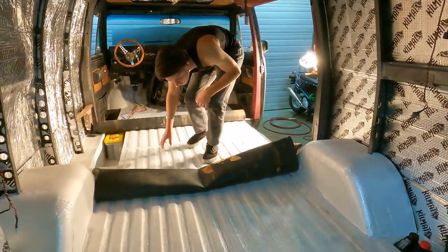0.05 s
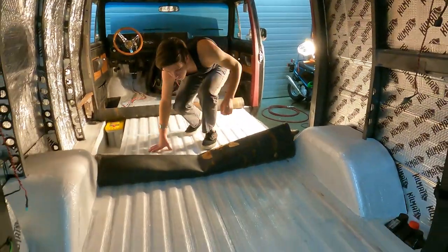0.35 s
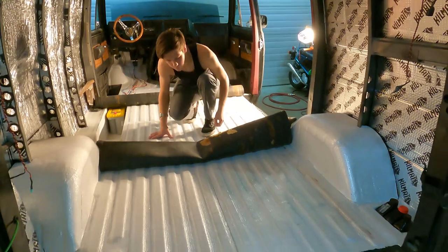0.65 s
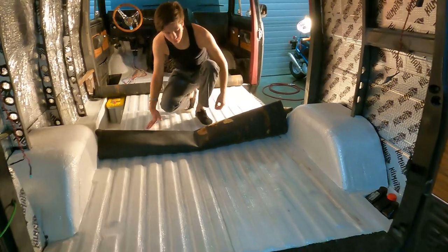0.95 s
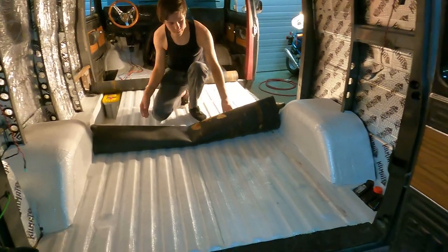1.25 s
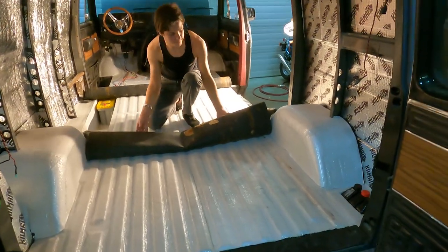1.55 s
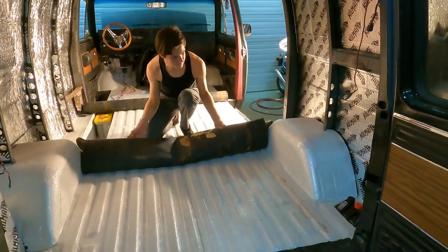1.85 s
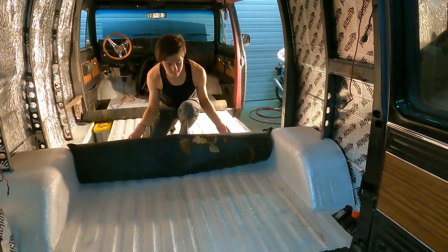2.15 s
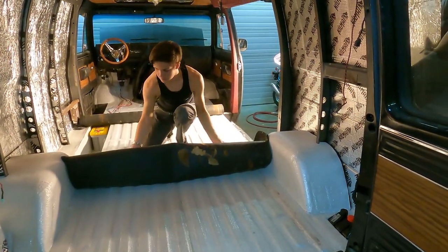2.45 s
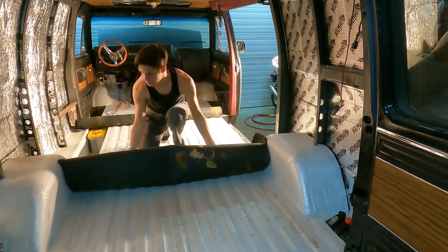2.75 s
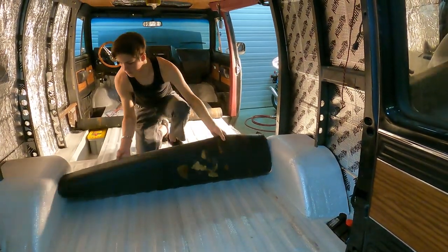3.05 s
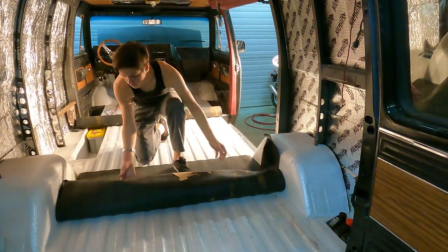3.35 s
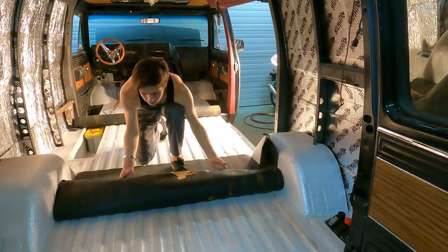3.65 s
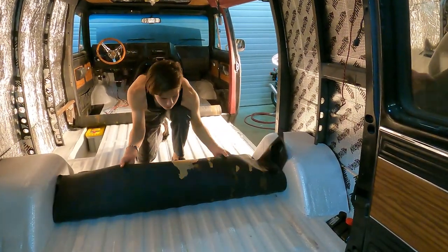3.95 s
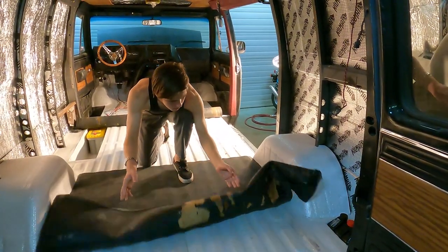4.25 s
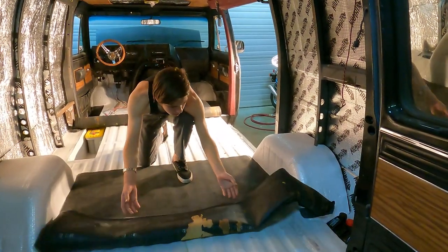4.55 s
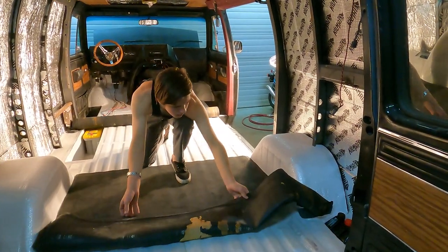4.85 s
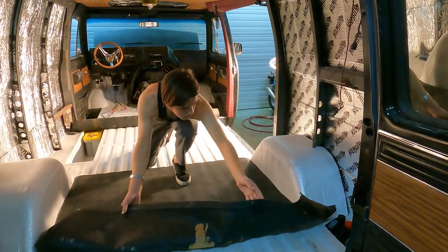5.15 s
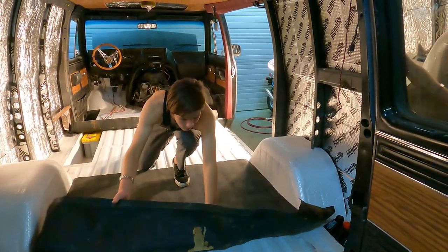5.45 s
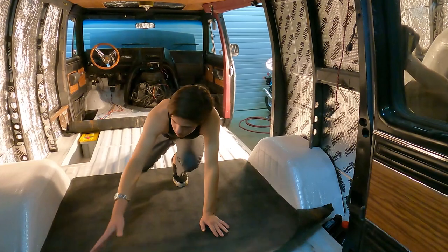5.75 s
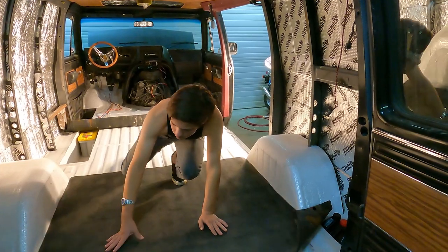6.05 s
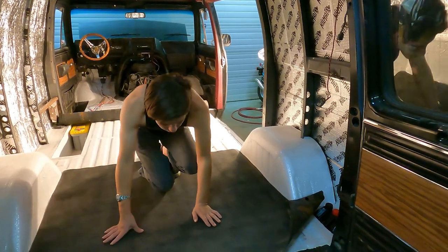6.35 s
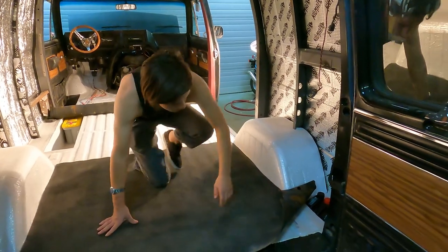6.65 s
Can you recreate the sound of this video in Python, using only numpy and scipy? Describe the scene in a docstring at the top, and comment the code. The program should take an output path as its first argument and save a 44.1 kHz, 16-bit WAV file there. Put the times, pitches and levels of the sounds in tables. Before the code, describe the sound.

Knees and shoes thud and scuff on a ringing van floor as heavy rubber rubs along and lands with two hard slaps.

```python
"""Inside a stripped van, heard from the rear doors, a thick rubber mat is pushed open over the floor.
Rubber drags, cloth swishes, and soles scuff and tick; knees, shoes and the roll thud on the ribbed
steel and rock the van. A loose bit of metal clinks, and twice the mat slaps down hard.
The floor rings, the bare cabin adds a short, boxy echo, and the slaps overload the microphone."""
import sys
import numpy as np
from scipy import signal
from scipy.fft import rfft, irfft, next_fast_len
from scipy.io import wavfile

SR = 44100
rng = np.random.default_rng(int(sys.argv[2]) if len(sys.argv) > 2 else 0)


def log_audio(samples):
    """Write samples as a 16-bit WAV file to the path given in sys.argv[1]."""
    # one column per channel
    frames = np.atleast_2d(samples).T
    # limit to full scale, then quantise
    limited = np.clip(frames, -1, 1)
    pcm = np.round(limited * 32767).astype(np.int16)
    wavfile.write(sys.argv[1], SR, pcm)


N = 295470
TIME = np.arange(N) / SR
SHORT = 2 ** 15  # samples in one event or echo
LEFT_RIGHT = np.array([[1], [-1]])


def undb(db):
    """Turn decibels into a volume factor."""
    return 10 ** (np.asarray(db) / 20)


def unit(x):
    """Scale a sound to an average strength (rms) of one."""
    return x / np.sqrt(np.mean(x ** 2))


def read(points, hz):
    """Look up a value between (frequency, value) points, with octaves evenly spaced."""
    point_hz, value = np.transpose(points)
    return np.interp(np.log(hz), np.log(point_hz), value)


def colour(x, points):
    """Turn each frequency up or down along a tone curve."""
    size = next_fast_len(len(x))
    hz = np.maximum(np.fft.rfftfreq(size, 1 / SR), 1)
    return irfft(rfft(x, size) * undb(read(points, hz)), size)[:len(x)]


def band(x, hz, width_hz):
    """Keep only the frequencies around hz."""
    low = np.hypot(hz, width_hz / 2) - width_hz / 2
    return signal.sosfilt(signal.butter(2, [low, low + width_hz], "band", fs=SR, output="sos"), x)


def swell(rise, fade):
    """Loudness of one event: it rises smoothly, then drops 60 dB every `fade` seconds."""
    t = TIME[:SHORT]
    onset = np.sin(np.pi / 2 * np.minimum(t / rise, 1)) ** 2
    return onset * np.exp(-np.log(1000) * np.maximum(t - rise, 0) / fade)


def add(track, start, sound):
    """Mix a short sound into a track at `start` seconds."""
    i = int(start * SR)
    track[..., i:i + SHORT] += sound[..., :N - i]


def wander(rate):
    """Glide to a new random value `rate` times a second."""
    return np.interp(TIME * rate, np.arange(2000), rng.standard_normal(2000))


def slips(rate, spread_db, size=SHORT):
    """Friction is a stream of tiny slips of uneven size, about `rate` a second."""
    chance, strength = rng.random(size), rng.standard_normal(size)
    at = np.flatnonzero(chance < rate / SR)
    out = np.zeros(size)
    out[at] = (-1.) ** at * undb(spread_db * strength[at])
    return out


# short rubs: (time [s], level [dB], pitch [Hz], rise [s], fade [s], grit compared with the rub [dB])
SCUFFS = [(0, -37.5, 790, 0.0013, 0.34, -6), (.259, -36, 814, 0.0067, 0.3, -3.5),
          (.527, -36, 1290, .03, 0.3, -5.5), (0.913, -33.5, 910, 0.032, 0.28, -3.5),
          (2.536, -26, 520, 0.0018, 0.2, -35), (2.631, -27.5, 600, 0.0011, 0.042, -30),
          (2.654, -28, 594, 0.0061, 0.054, -40), (2.811, -39.5, 610, 0.0018, 0.16, -39),
          (3.155, -29.5, 836, 0.021, 0.092, -9.5), (3.297, -20, 615, 0.028, 0.12, -47),
          (3.828, -41.5, 830, 0.0034, 0.2, -21), (3.931, -34, 715, 0.0025, 0.51, -38),
          (4.304, -31.5, 1400, .004, 0.041, -5), (4.319, -22.5, 350, 0.0031, 0.1, -30),
          (4.415, -18, 1670, .002, 0.049, -42), (4.597, -29, 417, 0.025, 0.32, -44),
          (4.636, -31, 910, 0.017, 0.2, -25), (5.033, -26, 520, 0.062, 0.081, -52),
          (5.577, -40.5, 1810, 0.0021, 0.26, -17), (6.493, -42, 2160, 0.0013, 0.15, -20.5)]

def scuffs():
    """A sole, cloth or rubber slips briefly along the floor, with grit hissing above the rub."""
    out = np.zeros(N)
    for start, db, hz, rise, fade, grit_db in SCUFFS:
        friction = slips(3000, spread_db=4.8)
        rub = unit(band(friction, hz, width_hz=1.09 * hz))
        grit = undb(grit_db) * unit(band(friction, hz=3320, width_hz=2030))
        add(out, start, undb(db) * (rub + grit) * swell(rise, fade))
    return out


# brushes over the mat: (time [s], level [dB], rise [s])
SWISHES = [(0, -50, 0.0024), (2.271, -48, 0.072), (4.202, -45, 0.033), (4.828, -52.5, 0.027),
           (5.101, -44, 0.034), (5.65, -57, 0.021)]

def swishes():
    """Cloth and hands brush the rubber with a bright hiss."""
    out = np.zeros(N)
    for start, db, rise in SWISHES:
        hiss = unit(band(slips(6000, spread_db=4.2), hz=6500, width_hz=5800))
        add(out, start, undb(db) * hiss * swell(rise, fade=0.13))
    return out


# slides of the mat, a shoe or a trouser leg, with the strengths they reach before dragging() mixes them:
# (start [s], end [s], rubbing [dB], flexing [dB], hiss [dB])
PUSHES = [(0.018, 0.245, -73, -58, -63.5), (0.33, 0.612, -73, -61, -55.5), (0.807, 1.008, -64, -39.5, -66),
          (1.083, 1.515, -71, -62, -62), (1.574, 2.144, -45, -44.5, -59.5),
          (2.14, 2.416, -42, -38.5, -54.5), (2.4, 2.613, -51, -37, -66), (2.812, 3.35, -33.5, -30, -47.5),
          (3.73, 3.943, -43, -39.5, -63), (3.882, 4.36, -32, -28.5, -47), (4.567, 4.69, -56, -32.5, -83),
          (4.8, 5.14, -41.5, -38, -59), (5.168, 5.232, -43.5, -41, -61), (5.316, 5.623, -45.5, -40, -57),
          (6.32, 6.7, -49.5, -42.5, -59)]

def pushes(onset_s=0.045, grow_db_per_s=22, stop_db_per_s=190):
    """Strength of rubbing, flexing and hiss: each push gathers speed, then stops."""
    resting = undb([-65, -47, -70])  # what goes on between moves
    power = resting[:, None] ** 2 * np.ones(N)
    for start, end, *levels_db in PUSHES:
        onset = np.clip((TIME - start) / onset_s, 0, 1)
        speed = onset * undb(np.minimum(grow_db_per_s * (TIME - end), stop_db_per_s * (end - TIME)))
        power += np.outer(undb(levels_db), speed) ** 2
    settling = np.outer(undb([-24.5, -19.5, -38]), swell(rise=0.032, fade=0.64))
    for start, db, *_ in SLAPS:  # the mat creeps into place after each slap
        add(power, start, (undb(db) * settling) ** 2)
    return np.sqrt(power)


# tone curves of rubber flexing, rubbing and hissing: (frequency [Hz], level [dB])
FLEX_TONE = [(50, -50), (100, -6.5), (150, -2), (210, -0.5), (290, -11), (400, -12), (600, -50),
             (1500, -88)]
RUB_TONE = [(200, 9), (450, 9), (620, 7), (800, 1), (1100, 4), (1600, -0.5), (2400, -42), (4000, -24),
            (9000, -28)]
HISS_TONE = [(800, 1.5), (2000, 4), (3200, 0.5), (4300, -3.5), (5500, -2.5), (7400, -2.5), (8400, -12.5),
             (12300, -16.5), (14000, -33), (16000, -35)]

def dragging():
    """The roll flops over the ribs, and its rubber rubs and hisses along the paint."""
    rub_strength, flex_strength, hiss_strength = pushes()
    grip = undb(1.5 * wander(rate=28))  # the rubber catches and lets go
    hiss = hiss_strength * unit(colour(slips(14000, spread_db=4, size=N), HISS_TONE))
    flex = flex_strength * unit(colour(slips(300, spread_db=2.9, size=N), FLEX_TONE))
    rub = rub_strength * grip * unit(colour(slips(1200, spread_db=2.3, size=N), RUB_TONE))
    return undb(-4) * flex + undb(-3) * rub + undb(5) * hiss


# soft blows of knees, shoes and the roll: (time [s], level [dB], pitch [Hz], fade [cycles])
THUDS = [(0.075, -29.5, 63, 7.9), (0.215, -15, 181.4, 52), (0.222, -18.5, 69, 8.1), (0.515, -22, 51, 22),
         (0.66, -23, 67, 6.7), (1.013, -24.5, 116, 8.9), (1.051, -26, 50, 10), (1.41, -26, 42.6, 16),
         (2.038, -30.5, 173.5, 90), (2.54, -16, 244, 12), (2.656, -12.5, 320, 4.8), (2.692, -20, 163, 5.5),
         (2.814, -20, 257, 1.6), (2.835, -29.5, 39.8, 23), (3.176, -27, 182, 57), (3.336, 0, 118.5, 12.8),
         (3.345, -5, 385, 18), (3.385, -21, 41.2, 12), (3.39, -9.5, 116, 14), (3.436, -13, 131, 35),
         (3.966, -18.5, 155, 22), (4.346, -12.5, 296, 17), (4.356, -7.5, 186, 14.6),
         (4.361, -21.5, 41.7, 6.3), (4.541, -21, 62.6, 20), (4.872, -27, 246, 20), (4.954, -31, 381, 29),
         (5.12, -28.5, 138, 20), (5.188, -32, 51.6, 42), (5.508, -28, 308, 24), (5.553, -25, 60, 5.9),
         (5.594, -23, 61.6, 16), (5.87, -10, 335, 50), (5.87, -23, 42, 13), (5.893, -6, 541, 37),
         (5.904, -15.5, 87, 16), (6.319, -29, 199.5, 62), (6.357, -20, 73, 13.5)]

def thuds(sag=0.12, sag_s=0.0075, rise_cycles=0.41, ribs_db=-11):
    """A padded blow swings one patch of floor; the pitch sags as weight settles on it."""
    out = np.zeros(N)
    for start, db, hz, cycles in THUDS:
        pitch = hz * (1 + sag * np.exp(-TIME[:SHORT] / sag_s))
        swing = np.sin(2 * np.pi * np.cumsum(pitch) / SR)
        ribs = unit(band(rng.standard_normal(SHORT), hz, width_hz=0.91 * hz))  # nearby ribs shake too
        loudness = undb(db) * swell(rise_cycles / hz, cycles / hz)
        add(out, start, loudness * (swing + undb(ribs_db) * ribs))
    return out


# tone curve of the van's rumble: (frequency [Hz], level [dB])
ROCK_TONE = [(20, -0.5), (38, 5), (60, 7.5), (90, -10), (140, -22), (400, -108)]

def rocking(rest_db=-55, blow_db=-10.5, deep_hz=50):
    """Shifting weight rocks the van after every thud, more after the deep ones."""
    power = np.full(N, undb(rest_db) ** 2)
    for start, db, hz, _ in THUDS:
        sway = undb(db + blow_db) * deep_hz / hz * swell(rise=0.024, fade=0.98)
        add(power, start, sway ** 2)
    return np.sqrt(power) * unit(colour(slips(400, spread_db=1.2, size=N), ROCK_TONE))


def snap(hz, width_hz, fade):
    """A hard contact makes one sharp click with a brief crunch behind it."""
    crunch = undb(5) * slips(9000, spread_db=1.2) * swell(0.00025, fade)
    crunch[0] += undb(15)  # the click
    return band(crunch, hz, width_hz)


# sharp little hits: (time [s], level [dB], pitch [Hz])
TICKS = [(.271, -23.5, 2430), (.605, -15, 3270), (1.516, -46, 7300), (1.737, -38.5, 4430),
         (1.987, -12.5, 2470), (2.4894, -36, 5700), (2.908, -37.5, 6500), (3.078, -36, 7000),
         (4.357, -24.5, 6600), (4.5766, -43.5, 7500), (5.254, -32, 2200), (5.289, -35.5, 5500),
         (5.4978, -15.5, 3080), (6.371, -35, 1800), (6.492, -46, 2740)]

def ticks():
    """Soles and grit snap against the steel and die away at once."""
    out = np.zeros(N)
    for start, db, hz in TICKS:
        add(out, start, undb(db) * snap(hz, width_hz=1.2 * hz, fade=0.024))
    return out


def clink(start=1.557, db=-27.5):
    """One small loose piece of metal rings, purer and longer than a tick."""
    out = np.zeros(N)
    add(out, start, undb(db) * snap(hz=5160, width_hz=1200, fade=0.057))
    return out


# the mat falls flat twice, in several hits, with a lighter flap in between:
# (time [s], level [dB], rise [s], fade [s], dull above [Hz], into the cabin [dB], left minus right [dB])
SLAPS = [(3.336, -15.5, 0.0023, 0.058, 3540, 0.5, 5.5), (3.3464, -9, 0.00037, 0.13, 4300, -3.5, 1.5),
         (4.412, -20, 0.0028, 0.076, 1910, 0.5, 1), (5.868, -1.5, 0.00031, 0.051, 13600, -1, 2.5),
         (5.892, -14, 0.0016, 0.062, 1456, -1.5, 1), (5.911, -19, 0.0016, 0.31, 1940, 2.5, 3)]
# tone curve of rubber hitting steel: (frequency [Hz], level [dB])
SLAP_TONE = [(30, -46), (100, 2), (180, -10), (350, -2.5), (560, 1.5), (800, -5.5), (1400, -4),
             (2200, -7.5), (3000, -7.5), (4200, -8.5), (6500, -8.5), (9000, -19), (12000, -17.5),
             (16000, -35)]

def slaps():
    """The mat lands patch after patch in a flash; gives the direct sound and what fills the cabin."""
    direct, spread = np.zeros((2, 2, N))
    for start, db, rise, fade, dull_hz, cabin_db, pan_db in SLAPS:
        patches = colour(slips(9000, spread_db=4.9), SLAP_TONE)
        patches = signal.sosfilt(signal.butter(1, dull_hz, fs=SR, output="sos"), patches)
        crack = undb(db + LEFT_RIGHT * pan_db / 2) * unit(patches) * swell(rise, fade)
        add(direct, start, crack)
        add(spread, start, crack * undb(cabin_db))
    return direct, spread


# notes at which the floor and cabin ring: (pitch [Hz], boost at that pitch [dB], fade [s])
FLOOR_NOTES = [(38.7, -5, 0.88), (53.6, -5.5, 0.86), (67.8, -16.5, 0.6), (123, -1, 1), (128.2, 6.5, 0.38),
               (138.5, 7, 0.6), (157, -8, 0.79), (197.9, 3, 0.5), (218, -1, 0.25), (275, 9.5, 0.4),
               (339, 5.5, 0.97), (419, 2, 0.41), (462.4, 10.5, 0.16), (470, -17, 0.43), (531.6, 10, 0.55),
               (597, 4, 0.13), (640, 8.5, 0.84)]

def floor_ring(x):
    """A sound shakes the steel floor, which rings on at its own fading notes."""
    t, ring = TIME[:SHORT], np.zeros(SHORT)
    for hz, db, fade in FLOOR_NOTES:
        damping = np.log(1000) / fade
        note = np.exp(-damping * t) * np.cos(2 * np.pi * hz * t)
        ring += undb(db) * 2 * damping / SR * note
    return signal.oaconvolve(x, ring)[:N]


# how long the cabin echoes: (frequency [Hz], fade [s])
ECHO_FADE = [(60, 0.4), (200, 0.15), (500, 0.36), (1500, 0.31), (4000, 0.35), (8000, 0.19), (14000, 0.042)]
# tone curve of the echo: (frequency [Hz], level [dB])
ECHO_TONE = [(40, 0.5), (130, -1), (300, 5), (600, 2.5), (2000, 3), (6000, -2.5), (12000, 0.5)]
# stereo width of the echo: (frequency [Hz], what differs between the ears against what they share [dB])
ECHO_WIDTH = [(40, -9.5), (130, -17), (300, -12), (600, -7), (2000, -4.5), (12000, -1.5)]

def cabin_echo(x, build_s=0.0026):
    """Sound from one spot bounces between the bare walls; the highest treble dies first."""
    hz = np.maximum(np.fft.rfftfreq(SHORT, 1 / SR), 1)
    shared, differing = np.sqrt(SHORT) * np.exp(2j * np.pi * rng.random((2, len(hz))))
    spectrum = shared + LEFT_RIGHT * differing * undb(read(ECHO_WIDTH, hz))
    spectrum *= undb(read(ECHO_TONE, hz))
    echo = np.zeros((2, SHORT))
    for centre_hz in 32 * 2 ** np.arange(10):
        octave = np.maximum(1 - np.abs(np.log2(hz / centre_hz)), 0)
        loudness = swell(build_s, read(ECHO_FADE, centre_hz))
        echo += irfft(spectrum * octave, SHORT) * loudness / np.linalg.norm(loudness)
    return signal.oaconvolve(np.atleast_2d(x), echo, axes=1)[:, :N]


def moving_echo(x, spots=4, hops_per_s=55):
    """The contact hops between spots along the mat, each with its own path to the walls."""
    shares = np.array([wander(hops_per_s) for _ in range(spots)]) ** 2 + 0.0083  # never quite zero
    shares /= np.linalg.norm(shares, axis=0)
    return sum(cabin_echo(x * share) for share in shares)


def scene():
    """Every contact is heard directly and off the walls; all but the ticks and clink ring the floor."""
    thud = thuds()
    scuff = scuffs() + swishes()
    tick = ticks() + clink()
    drag = dragging() + rocking()
    slap, slap_spread = slaps()
    direct = thud + slap + tick + undb(-1) * scuff + undb(1) * drag
    into_floor = undb(-3) * thud + undb(0.5) * slap_spread.mean(axis=0) + undb(-8.5) * (scuff + drag)
    into_cabin = slap_spread + undb(-5) * scuff + undb(-4.5) * tick + undb(-0.5) * drag
    boom = undb(-3.5) * cabin_echo(thud)  # a thud stays on one spot
    return direct + floor_ring(into_floor) + boom + moving_echo(into_cabin)


def record(dry, dull_hz=13500, top_hz=15700):
    """The microphone dulls the highest treble, flattens the biggest peaks and cuts the top."""
    dull = signal.sosfilt(signal.butter(3, dull_hz, fs=SR, output="sos"), dry)
    flattened = dull / (1 + dull ** 8) ** (1 / 8)
    return signal.sosfilt(signal.ellip(8, .2, 80, top_hz, fs=SR, output="sos"), flattened)


dry = scene()
out = record(dry)
log_audio(out)
```